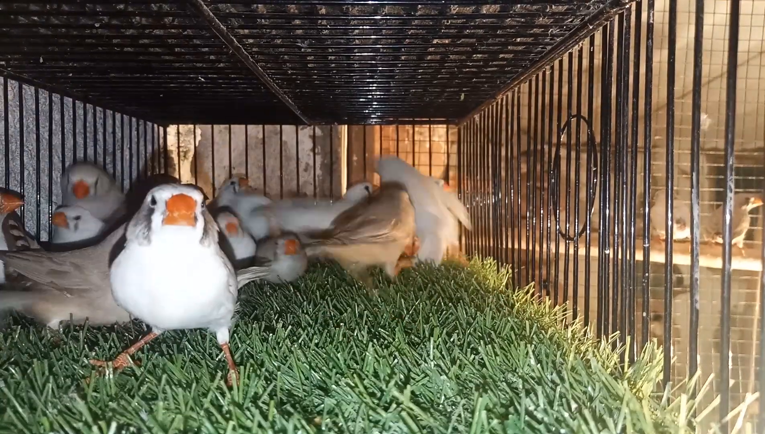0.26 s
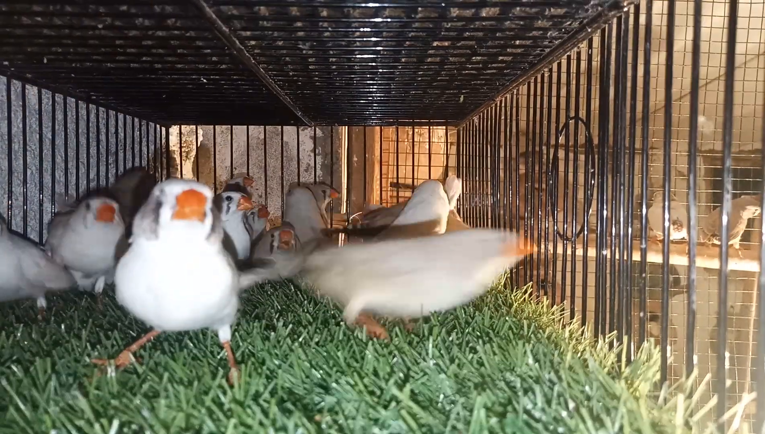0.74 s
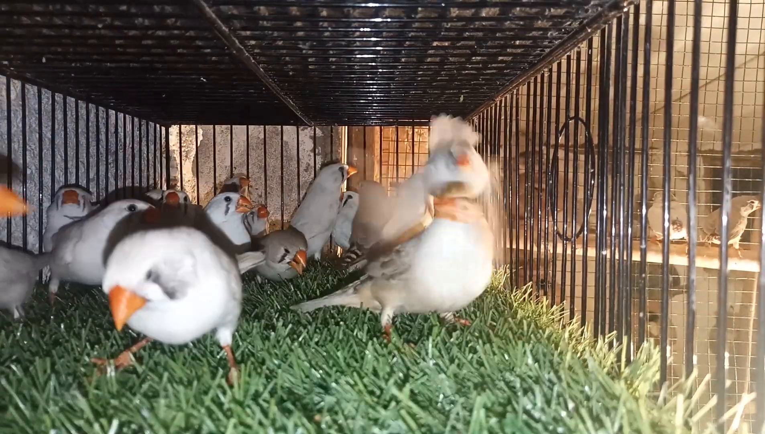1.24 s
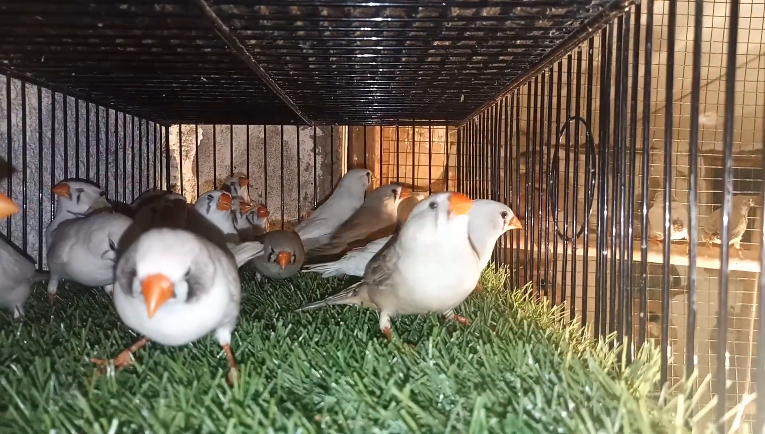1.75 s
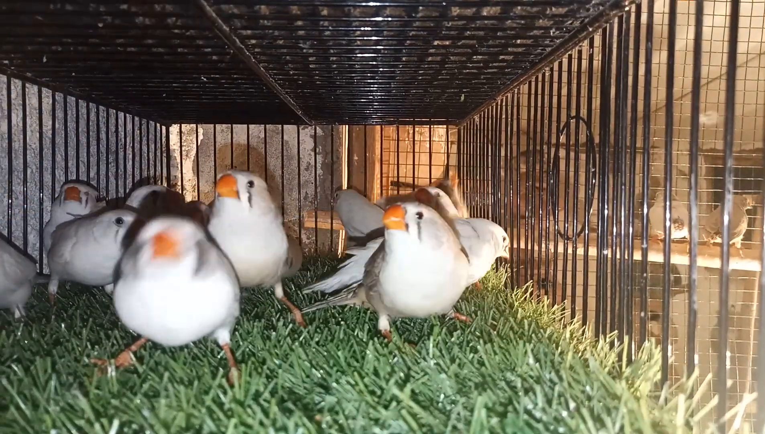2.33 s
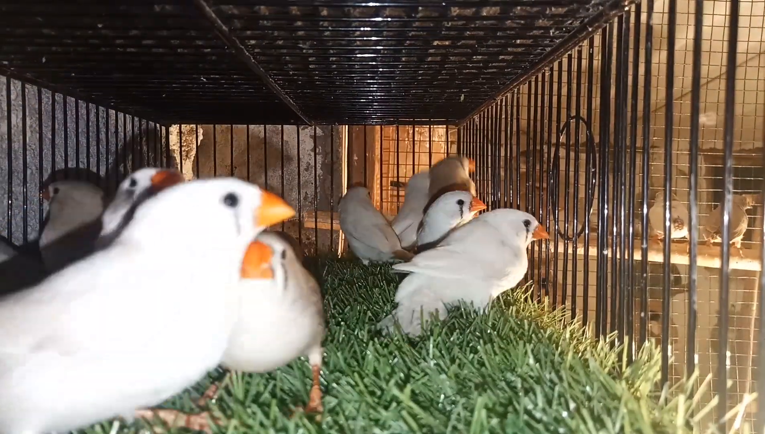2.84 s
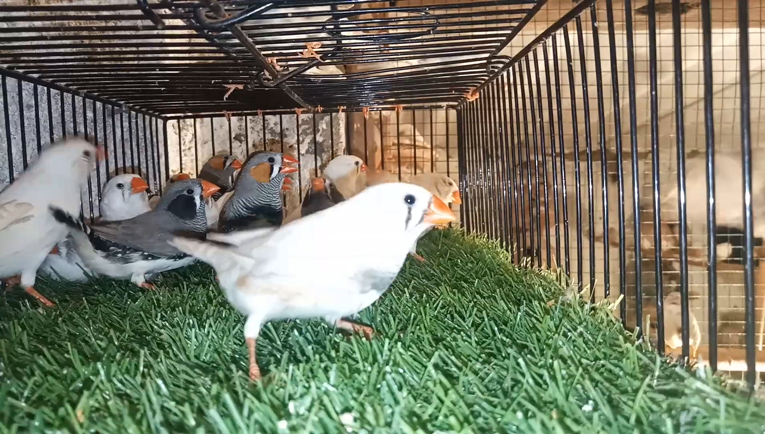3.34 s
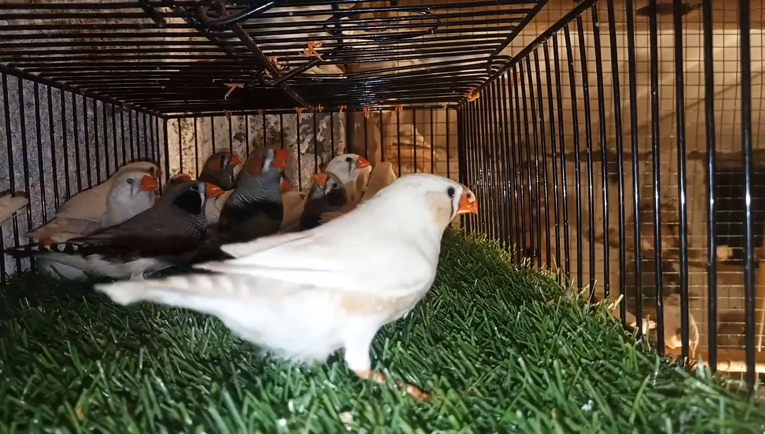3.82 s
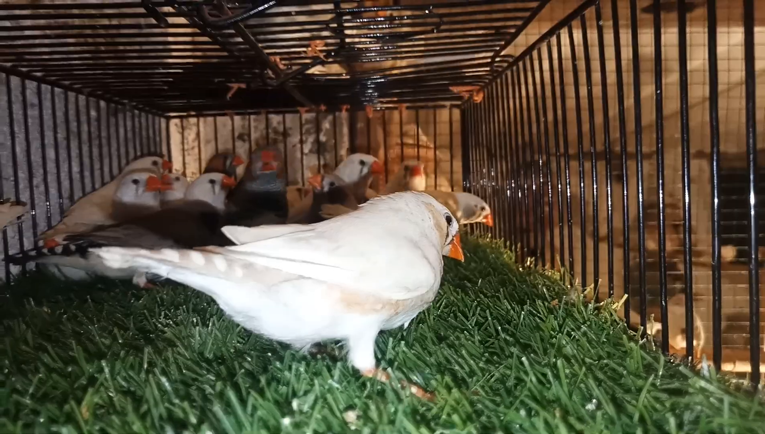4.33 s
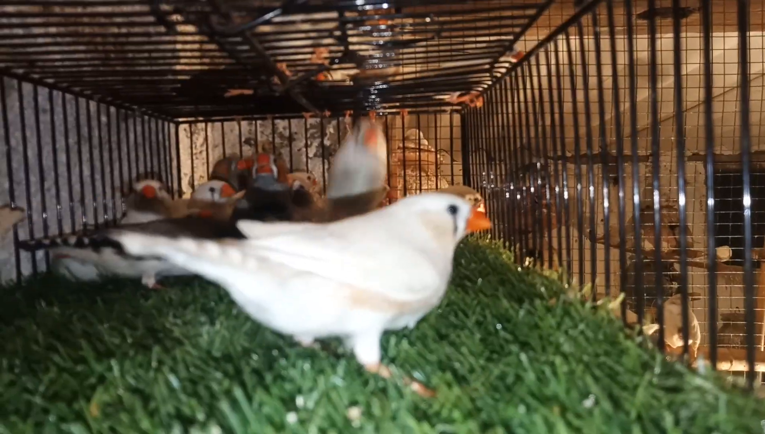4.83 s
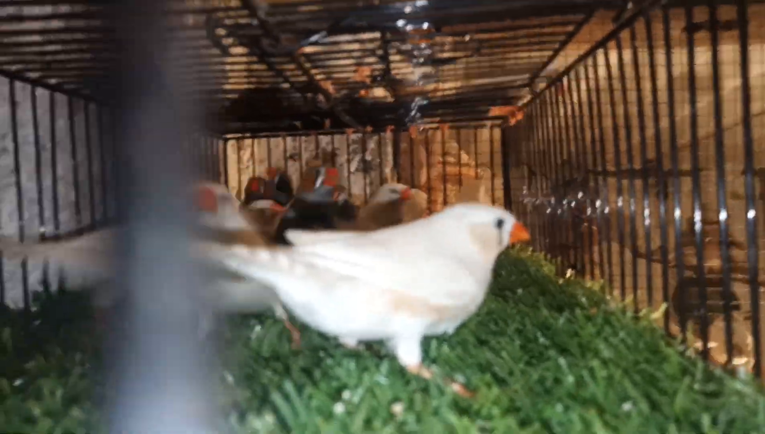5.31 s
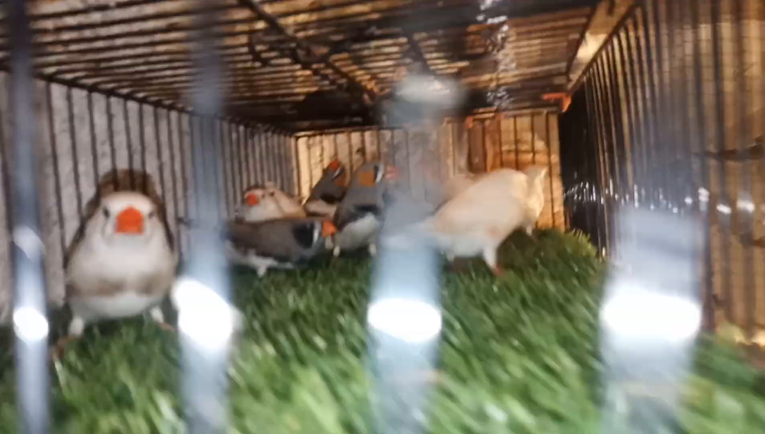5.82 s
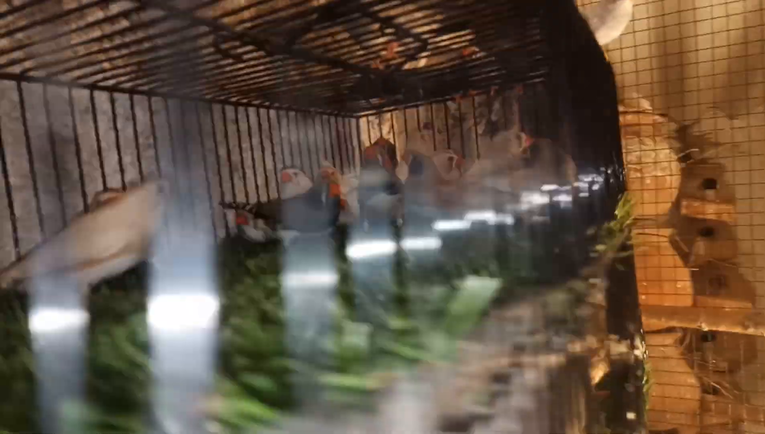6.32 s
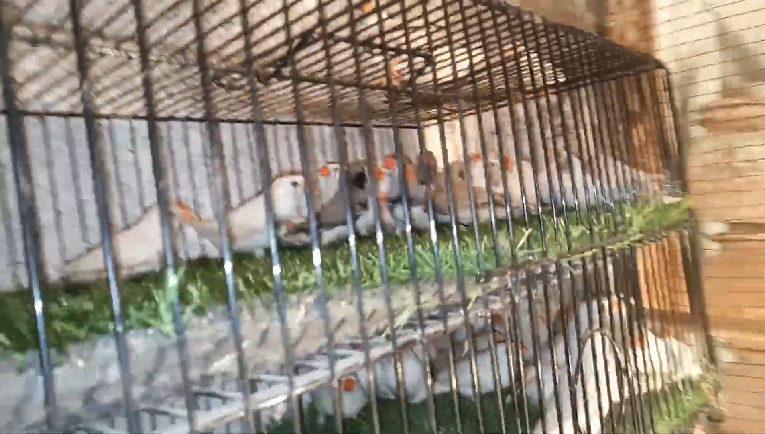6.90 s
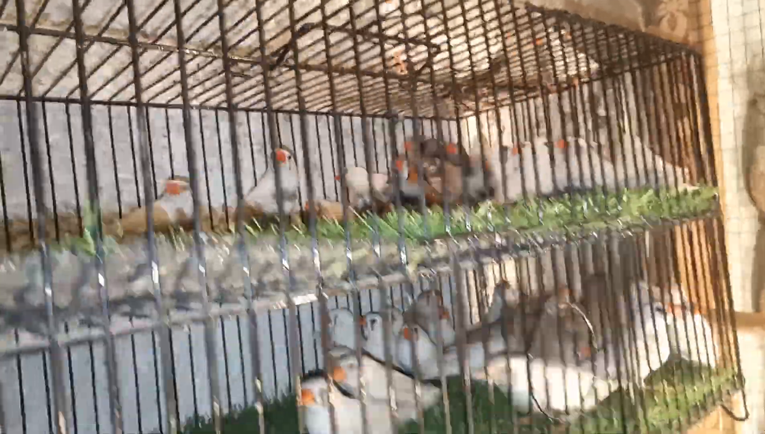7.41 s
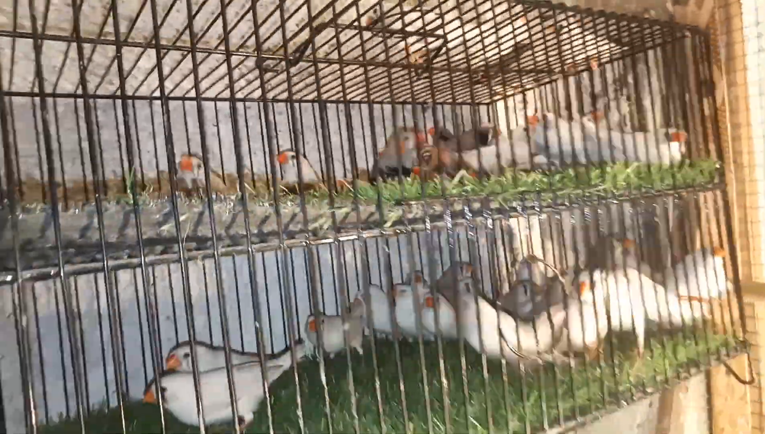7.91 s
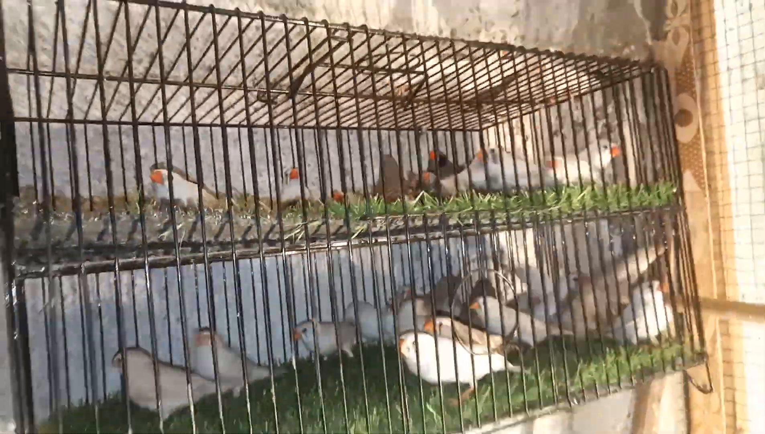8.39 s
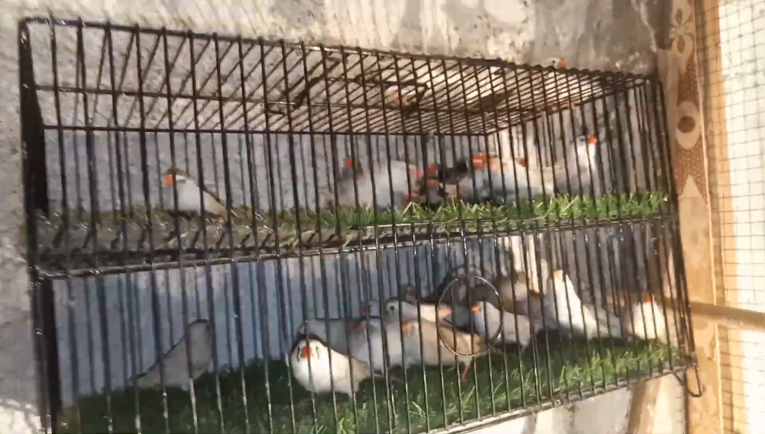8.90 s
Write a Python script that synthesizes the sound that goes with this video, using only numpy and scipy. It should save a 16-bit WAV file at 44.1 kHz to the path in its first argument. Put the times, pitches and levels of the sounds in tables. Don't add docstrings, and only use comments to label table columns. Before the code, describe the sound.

Caged small birds in a reverberant room: nasal, buzzy peeps up close, a murmuring flock behind, soft low rumble and rustling bedding. A short dead gap splits the scene near the start of its second third. Afterwards calls quicken, a hollow wooden nest knocks twice, wings flurry, and bright parakeet screeches and whistles burst out, with a few small claw ticks on wire near the end. The sound is slightly muffled, with little high treble.

```python
import sys
import numpy as np
from scipy import signal
from scipy.fft import rfft, irfft
from scipy.io import wavfile
from scipy.ndimage import uniform_filter1d

SR = 44100
rng = np.random.default_rng(int(sys.argv[2]) if len(sys.argv) > 2 else 0)


def log_audio(samples):
    frames = np.atleast_2d(samples).T
    limited = np.clip(frames, -1, 1)
    pcm = np.round(limited * 32767).astype(np.int16)
    wavfile.write(sys.argv[1], SR, pcm)


def voltage_ratio(decibels):
    exponent = np.asarray(decibels, float) / 20
    return 10 ** exponent


N = 403515

# (time [s], length [s], top pitch [Hz], level [dB], nasal partial [dB])
ARCHED_CALLS = [(1.502, 0.076, 574, -38, -4.5), (7.317, .09, 610, -35, -14), (7.02, .09, 606, -41, -14),
                (7.068, .085, 513, -34, -24), (5.64, .065, 574, -38, -16), (5.33, .05, 525, -39, -20),
                (7.15, .08, 540, -40, -10)]
SCOOPED_CALLS = [(3.66, .068, 576, -43, -16), (4.217, .09, 589, -29, -10), (6.012, .14, 552, -36, -12),
                 (8.042, .089, 529, -39.5, -4), (5.745, .08, 655, -36, -24)]
FALLING_CALLS = [(0.892, 0.091, 526, -29.5, -8), (1.191, 0.086, 680, -30, -13.5),
                 (2.197, 0.075, 645, -30.5, -7), (2.775, .065, 595, -38, -20), (7.225, .07, 665, -36, -18),
                 (2.99, 0.09, 550, -45, -13), (4.029, 0.15, 668, -31.5, -23), (4.318, .098, 532, -31, -6.5),
                 (6.134, 0.11, 567, -37, -6), (8.898, 0.089, 510, -39, -18), (9.018, .21, 517, -35, -18.5)]
LEVEL_CALLS = [(-.04, 0.118, 598, -28.5, -11.5), (.12, 0.095, 642, -35, -27), (0.854, .12, 485, -39.5, 1.5),
               (2.832, .058, 550, -38, -17), (2.885, .07, 496, -41, -17), (3.403, 0.11, 525, -52, -12.5),
               (4.797, .06, 545, -32, -14), (5.39, 0.058, 547, -34, -16), (5.46, 0.115, 492, -38.5, -9.5),
               (5.88, .09, 636, -37, -28), (7.496, .17, 655, -35.5, -22), (8.361, .071, 524, -46, -2),
               (8.702, .13, 525.5, -38.5, -12.5)]
DOUBLED_CALLS = [(.681, 0.084, 629, -36, -7.5), (1.277, 0.1, 613.4, -31, -6.5),
                 (2.465, .133, 606, -28.5, -5), (3.243, 0.12, 622, -25.5, -6)]
HOARSE_CALLS = [(4.716, .09, 575, -30, -12), (2.709, 0.072, 636, -30, -22), (6.84, .14, 590, -33, -20)]
CHESTY_CALLS = [(4.853, .085, 488, -39, -6), (4.945, .08, 502, -39, -6), (5.805, .078, 657, -27.5, -18),
                (7.372, .1, 545, -34, -6), (5.245, .085, 603, -37, -18), (5.021, 0.064, 515, -32, -9.5)]
# (rise [share], fall at 600 Hz [share], chest partials [dB], pulse doubling [dB], rasp [0-1])
CALL_SHAPES = [
    (0.17, 0.13, -10, -26, .2),
    (0.25, .045, -2.5, -24, .18),
    (0.05, 0.1, -9.5, -25.5, .2),
    (.04, 0.04, -8, -24, .22),
    (0.22, 0.08, -10, -14.5, .22),
    (.1, .12, -7, -18, .45),
    (.06, .06, -1.5, -25, .18),
]
FALL_GROWS_WITH_PITCH, CHEST_FOLLOWS_NASAL = 1.8, 0.16
BEAK_HZ, BEAK_FALLS_WITH_PITCH = 3720, 0.24
DULLING = 0.8

# (time [s], length [s], first pitch [Hz], last pitch [Hz], level [dB])
CHIRP_NOTES = [(.02, .05, 3650, 3550, -31), (.226, .06, 2500, 2600, -37), (.31, 0.04, 2600, 2400, -37),
               (.478, .055, 2500, 2800, -18), (1.998, 0.06, 3400, 3400, -37),
               (3.203, 0.0085, 3600, 3420, -31), (3.28, 0.06, 3300, 3400, -25.5),
               (3.966, .06, 2750, 2700, -27.5), (4.281, .04, 3610, 3765, -22.5),
               (4.426, .04, 3300, 3150, -35), (4.285, .04, 2900, 2800, -30),
               (4.499, .03, 3780, 3690, -37.5), (4.544, 0.034, 2546, 2810, -33.5),
               (4.81, .029, 3527, 3350, -31), (5.066, 0.029, 3130, 2940, -31.5),
               (5.889, 0.05, 3880, 3827, -33), (6.826, 0.058, 3980, 3800, -30),
               (7.668, .08, 3382, 2967, -14), (7.791, .091, 5050, 4935, -18.5),
               (7.8, 0.064, 2910, 2875, -13.5), (7.961, 0.052, 3725, 3990, -25),
               (8.067, 0.04, 4170, 3834, -21), (8.146, .07, 2980, 3270, -22.5),
               (8.474, .046, 3860, 3453, -20.5), (8.565, .054, 3500, 3500, -29),
               (8.66, .06, 3500, 3320, -32)]
WHISTLE_NOTES = [(.228, .08, 3050, 3500, -32), (.218, .035, 1800, 2250, -40),
                 (0.275, 0.056, 4500, 4450, -34.5), (8.395, .08, 3950, 3900, -30),
                 (8.565, .08, 3920, 3850, -25), (6.105, .07, 4550, 4500, -33),
                 (5.762, .06, 3950, 3950, -35), (.675, .03, 2100, 2150, -39), (0.491, .1, 2127, 2245, -30),
                 (3.667, .052, 3280, 3470, -31), (1.948, .075, 4300, 4420, -31),
                 (6.468, .04, 2030, 2033, -29), (7.85, .08, 3000, 2980, -23), (3.885, .06, 4050, 3900, -38),
                 (6.553, 0.042, 2960, 3074, -26), (6.653, 0.051, 3125, 2965, -25),
                 (6.545, .26, 6080, 6120, -30.5), (7.655, .06, 2250, 2500, -23),
                 (7.795, 0.1, 2403, 2492, -19.5), (7.907, 0.041, 4430, 4600, -24),
                 (7.94, 0.1, 2208, 2278, -23), (8.028, 0.048, 3600, 4030, -12),
                 (8.03, .054, 2446, 2343, -25.5), (8.216, 0.034, 3837, 3743, -20),
                 (8.386, 0.05, 1992, 1970, -29)]
SCREECH_NOTES = [(.3, 0.038, 3910, 3650, -28.5), (.488, .045, 3204, 3740, -19.5),
                 (1.885, 0.078, 3700, 3600, -36), (2.02, 0.07, 3900, 3500, -36),
                 (3.769, 0.094, 3890, 3730, -44), (3.972, 0.06, 1900, 1800, -33.5),
                 (3.972, .07, 4000, 3850, -29), (4.736, .06, 3910, 3513, -30.5),
                 (5.815, 0.055, 3900, 3800, -35), (6.048, .085, 3825, 4150, -34.5),
                 (6.168, .037, 3955, 3660, -29), (6.331, 0.041, 3350, 3750, -14.5),
                 (6.392, 0.05, 4200, 3700, -19), (6.398, .05, 2700, 2400, -27),
                 (6.43, .04, 3700, 3300, -22), (6.464, .05, 4200, 3950, -19), (6.332, .03, 2800, 2600, -25),
                 (6.538, .009, 3500, 4100, -7), (2.66, .05, 2900, 3000, -40), (2.718, .06, 3700, 3500, -38),
                 (.495, .06, 5900, 6200, -18), (6.546, .034, 4000, 3700, -13),
                 (6.541, 0.034, 5300, 5600, -13), (6.637, 0.045, 4593, 3510, -11.5),
                 (6.642, 0.065, 5460, 5710, -14.5), (6.88, .09, 3600, 3400, -31),
                 (8.055, 0.069, 5000, 4800, -22), (8.147, .07, 4630, 4100, -18),
                 (8.432, 0.035, 3900, 3400, -26), (8.62, 0.07, 3800, 3500, -29),
                 (8.73, .074, 3907, 3534, -26.5), (8.749, 0.05, 1725, 1639, -33.5)]
WHISTLE_OVERTONES = [-4.5, -3, -1, 3, -2]
WHISTLE_WARBLE_HZ_S, CHIRP_WARBLE_HZ, SCREECH_WARBLE_HZ, WARBLE_PER_GLIDE = 2.8, 213, 423, 0.3

# (time [s], length [s], first pitch [Hz], last pitch [Hz], level [dB])
COO_NOTES = [(0.425, 0.24, 554, 783, -41.5), (0.577, 0.27, 787.3, 794, -46.5),
             (0.79, 0.23, 779, 732, -42.5), (3.265, 0.195, 680, 690.5, -37), (3.448, 0.11, 674, 661.6, -39),
             (3.657, 0.07, 648, 643, -44.5), (5.251, 0.13, 594, 645, -41.5), (5.42, 0.2, 657, 665, -42),
             (6.506, 0.08, 603, 664, -38.5), (6.584, 0.082, 667, 675, -35), (1.848, 0.06, 1327, 1303, -44),
             (2.005, 0.1, 1360, 1360, -35.5), (7.224, 0.041, 1754, 1250, -34.5),
             (1.48, 0.34, 2870, 2810, -45), (1.7, .7, 84, 80, -37), (2.2, .5, 80, 78, -38),
             (3.0, .45, 76, 78, -39), (3.35, .6, 78, 80, -38), (.46, .09, 1030, 990, -41),
             (3.7, .2, 650, 660, -44), (6.3, .22, 590, 610, -43), (1.6, .24, 2840, 2820, -44)]

# (time [s], hold [s], level [dB], share of low voices [dB])
FLOCK_OUTBURSTS = [(.19, 0.16, -45.5, -5.5), (0.529, 0.067, -42.5, 2), (1.64, 0.05, -50, -4),
                   (1.952, 0.16, -50, -9), (2.68, .24, -47, -10), (3.293, 0.012, -36, 1),
                   (3.584, 0.13, -50.5, -9), (3.94, 0.57, -43.5, -6), (4.76, 0.1, -38, -8),
                   (5.56, .06, -45, -3), (5.225, 0.21, -43, -2), (5.776, .12, -39, -3.5),
                   (6.175, 0.06, -33, -10), (6.38, 0.1, -32, -10), (6.502, 0.31, -36.5, -17.5),
                   (6.886, 0.11, -36, -6), (7.03, .08, -40, -5), (7.16, 0.29, -42, -1.5),
                   (7.852, .24, -32.5, -36), (8.205, .28, -36, -9.5), (8.584, 0.035, -33, -7),
                   (8.706, 0.081, -33.5, -11), (9.11, .1, -49, -2)]
OUTBURST_RISE_DB_PER_S, OUTBURST_FADE_DB_PER_S = 160.5, 148.5
MURMUR_DB, MURMUR_LOW_DB = -63, -56.5

# (time [s], level [dB])
MACHINE_LEVEL = [(0.0, -36), (.43, -47), (.74, -37.5), (1.17, -45.5), (1.4, -39.5), (1.63, -51.5),
                 (2.34, -43), (2.75, -54), (3.18, -41), (3.4, -42.5), (3.8, -44.5), (4.4, -50.5),
                 (5.4, -47), (5.8, -50.5), (6.3, -42), (7.5, -44), (8.0, -41.5), (9.15, -50)]
# (frequency [Hz], density [dB per Hz])
RUMBLE_SPECTRUM = [(15, -55), (25, -45), (32, -34), (48, -26), (70, -3.5), (91, 4.5), (149, 1), (179, -4),
                   (210, -31.5), (260, -25.5), (340, -50.5), (570, -120)]
# (frequency [Hz], density [dB per Hz])
RUSTLE_SPECTRUM = [(180, -4), (300, -3), (600, -2.5), (1000, -8.5), (2000, -8), (3500, -9.5), (4800, -26.5)]
BEDDING_DB, BEDDING_FOLLOWS = -49.5, 0.35
# (time [s], hold [s], rustle [dB], push of air [dB])
WING_FLURRIES = [(.48, .03, -52.5, -43.5), (1.71, 0.063, -92, -38), (2.9, 0.01, -63.5, -48),
                 (3.18, 0.0091, -43, -36), (4.52, .03, -50.5, -41.5), (5.2, 0.067, -54, -60.5),
                 (5.89, 0.022, -48.5, -41), (6.5, 0.23, -43, -56), (6.65, 0.01, -51, -41),
                 (6.88, 0.069, -41.5, -48), (7.26, 0.047, -49.5, -43.5), (7.6, 0.26, -44, -42.5),
                 (7.9, 0.23, -42, -48.5), (8.2, 0.52, -43.5, -57)]
FLURRY_RISE_DB_PER_S, FLURRY_FADE_DB_PER_S = 90, 57

# (time [s], peak level [dB])
NEST_HITS = [
    (4.468, -28.5),
    (4.484, -19),
]
# (frequency [Hz], level [dB], decay by 60 dB [s])
NEST_MODES = [
    (334, -21, .15),
    (408, -3, 0.47),
    (475, 1, 0.39),
    (1030, -8, 0.064),
]
# (time [s], peak level [dB])
CLAW_TICKS = [
    (8, -28),
    (8.421, -46),
    (8.52, -25.5),
]

# (frequency [Hz], gain [dB])
MICROPHONE_RESPONSE = [(40, -8), (70, -3), (4300, 0.5), (4900, -10.5), (5500, -22), (6200, -23),
                       (6900, -36.5), (9500, -45.5), (12000, -42), (14000, -45.5)]
ROOM_T60_S = 0.25
HISS_DB = -76
GAP_START_S, GAP_END_S, FULL_LEVEL_S = 3.0515, 3.1675, 3.1945


def at_hz(points, hz):
    table_hz, table_db = np.transpose(points)
    return np.interp(np.log(np.maximum(hz, 1)), np.log(table_hz), table_db)


def in_time(rows):
    s, *columns = np.transpose(rows)
    return [np.interp(np.arange(N) / SR, s, column) for column in columns]


def rms_one(x):
    return x / np.sqrt(np.mean(x ** 2) + 1e-20)


def wander(rate_hz, size):
    sos = signal.butter(2, rate_hz, fs=SR, output="sos")
    return rms_one(signal.sosfilt(sos, rng.standard_normal(size + 3000))[3000:])


def chance():
    size = N + SR + SR // 2
    return np.array([wander(hz, size) for hz in (81, 900, 48, 170, 130)])


def coloured(points):
    gain = voltage_ratio(at_hz(points, np.fft.rfftfreq(N, 1 / SR)))
    return rms_one(irfft(rfft(rng.standard_normal(N)) * gain, N))


def add(out, s, sound):
    i = int(s * SR)
    part = sound[max(-i, 0):N - i]
    out[max(i, 0):max(i, 0) + len(part)] += part


def swell(length, rise, fall):
    u = np.linspace(0, 1, int(length * SR))
    ramp = np.clip(np.minimum(u / rise, (1 - u) / fall), 0, 1)
    return u, np.sin(np.pi / 2 * ramp) ** 2


def bursts(rows, rise_db_per_s, fade_db_per_s):
    s, hold, *levels = np.transpose(rows)[:, :, None]
    t = np.arange(0, N + 64, 64) / SR
    rise_loss = rise_db_per_s * np.maximum(s - t, 0)
    fade_loss = fade_db_per_s * np.maximum(t - s - hold, 0)
    gains = []
    for db in levels:
        power = np.sum(voltage_ratio(2 * (db - rise_loss - fade_loss)), axis=0)
        gains.append(np.interp(np.arange(N) / SR, t, np.sqrt(power)))
    return gains


def room(x):
    t = np.arange(int(0.6 * SR)) / SR
    tail = rng.standard_normal(len(t)) * voltage_ratio(-60 * t / ROOM_T60_S) * (t > 0.004)
    return signal.fftconvolve(x, tail / np.sqrt(np.sum(tail ** 2)))[:N]


def finch_call(luck, length, top_hz, rise, fall, nasal_db, chest_db, double_db, rasp=0.25,
               beak_hz=3650, far_db=-8):
    u, shape = swell(length, 0.24, 0.18)
    jitter, breath, sway = luck[:3, :len(u)]
    arch = 1 - rise * (1 - u) ** 4.5 - fall * u ** 4.5
    hz = top_hz * arch * (1 + 0.025 * rasp * jitter)
    phase = 2 * np.pi * np.cumsum(hz) / SR
    beak = [(500, nasal_db - 16.5), (1150, nasal_db), (1800, chest_db - 3), (2500, chest_db - 2),
            (beak_hz - 650, -9), (beak_hz, 1.5), (beak_hz + 750, -9), (6300, far_db - 26), (9000, far_db - 37)]
    k = np.arange(1, 13)[:, None]
    gain = voltage_ratio(at_hz(beak, k * hz) + 1.5 * rng.standard_normal(k.shape))
    turns = rng.random(k.shape) + u * rng.normal(0, 1.02, k.shape)
    gain = gain * voltage_ratio(1.5 * np.sin(2 * np.pi * turns))
    stack = np.sum(gain * np.sin(k * phase + 0.94 * rng.standard_normal(k.shape)), axis=0)
    uneven = 1 + 2 * voltage_ratio(np.minimum(double_db, -3)) * np.cos(phase / 2) + rasp * breath
    return shape * rms_one(stack * uneven) * voltage_ratio(3.0 * u + 0.5 * sway)


def finches(luck):
    out = np.zeros(N)
    tables = (ARCHED_CALLS, SCOOPED_CALLS, FALLING_CALLS, LEVEL_CALLS, DOUBLED_CALLS, HOARSE_CALLS,
              CHESTY_CALLS)
    for table, (rise, fall, chest_db, double_db, rasp) in zip(tables, CALL_SHAPES):
        for s, length, hz, level_db, nasal_db in table:
            own = luck[:, int((s + 1) * SR):]
            beak_hz = BEAK_HZ * (580 / hz) ** BEAK_FALLS_WITH_PITCH
            drop = fall * (hz / 600) ** FALL_GROWS_WITH_PITCH
            low_db = chest_db + CHEST_FOLLOWS_NASAL * (nasal_db + 12)
            far_db = DULLING * (level_db + 27)
            call = finch_call(own, length, hz, rise, drop, nasal_db, low_db, double_db, rasp, beak_hz, far_db)
            add(out, s, voltage_ratio(level_db) * call)
    return out


def rumble_and_rustle():
    machine_db, = in_time(MACHINE_LEVEL)
    wings, push = bursts(WING_FLURRIES, FLURRY_RISE_DB_PER_S, FLURRY_FADE_DB_PER_S)
    rumble = np.hypot(voltage_ratio(machine_db), push) * coloured(RUMBLE_SPECTRUM)
    bedding = voltage_ratio(BEDDING_DB + BEDDING_FOLLOWS * (machine_db - machine_db.mean()))
    stirring = voltage_ratio(1.0 + 2.56 * wander(4.9, N))
    return rumble + np.hypot(bedding, wings) * stirring * coloured(RUSTLE_SPECTRUM)


def chirp(luck, length, first_hz, last_hz, warble_hz, effort_db=-20):
    u, shape = swell(length, 0.06, 0.4)
    warble = 1.1 * warble_hz * (1 - 0.5 * u) * np.sin(1.5 * luck[3, :len(u)])
    hz = last_hz + (first_hz - last_hz) * (1 - u) ** 2.5 + warble
    phase = 2 * np.pi * np.cumsum(hz) / SR
    throb = voltage_ratio(3.75 * luck[4, :len(u)])
    tones = np.sin(phase)
    for k, db in enumerate(WHISTLE_OVERTONES, start=2):
        shrill_db = 0.5 * effort_db * (k * hz > 4700)
        tones = tones + voltage_ratio(db + shrill_db) * np.sin(k * phase) * (k * hz < 0.45 * SR)
    return shape * rms_one(throb) * tones * np.sqrt(2)


def parakeets(luck):
    out = np.zeros(N)
    notes = [tuple(note) + (WHISTLE_WARBLE_HZ_S / note[1],) for note in WHISTLE_NOTES]
    for table, warble_hz in ((CHIRP_NOTES, CHIRP_WARBLE_HZ), (SCREECH_NOTES, SCREECH_WARBLE_HZ)):
        for note in table:
            glide_hz = abs(note[3] - note[2])
            notes.append(tuple(note) + (warble_hz + WARBLE_PER_GLIDE * glide_hz,))
    for k, (s, length, first_hz, last_hz, level_db, warble_hz) in enumerate(notes):
        own = luck[:, k * N // len(notes):]
        sound = chirp(own, length, first_hz, last_hz, warble_hz, level_db + 9.5)
        add(out, s, voltage_ratio(level_db) * sound)
    return out


def flock(luck, count):
    out = np.zeros(N)
    for s, size, pitch, arch, kind, at in rng.random((count, 6)):
        own = luck[:, int(at * N):]
        if kind < 0.7:
            rise, fall = 0.0623 + 0.207 * arch, 0.055 + 0.12 * arch
            call = finch_call(own, 0.0497 + 0.0461 * size, 490 + 190 * pitch, rise, fall,
                              nasal_db=-13.5, chest_db=-4.5, double_db=-19.5, rasp=0.4)
        else:
            call = chirp(own, 0.017 + 0.04 * size, 3000 + 1300 * pitch, 3000 + 1200 * arch, warble_hz=400)
        add(out, s * N / SR, call)
    out = room(out) + voltage_ratio(-4.5) * out
    out = out / np.sqrt(uniform_filter1d(out ** 2, size=3500) + 1e-4)
    rows = [(s, hold, db, db + share_db) for s, hold, db, share_db in FLOCK_OUTBURSTS]
    high_gain, low_gain = bursts(rows, OUTBURST_RISE_DB_PER_S, OUTBURST_FADE_DB_PER_S)
    low = signal.sosfiltfilt(signal.butter(3, 2400, fs=SR, output="sos"), out)
    high_voices = (high_gain + voltage_ratio(MURMUR_DB)) * rms_one(out - low)
    low_voices = (low_gain + voltage_ratio(MURMUR_LOW_DB)) * rms_one(low)
    return high_voices + low_voices


def doves(luck):
    out = np.zeros(N)
    for s, length, first_hz, last_hz, level_db in COO_NOTES:
        u, shape = swell(length, 0.62, 0.25)
        pitch_sway = luck[2, int(s * SR):][:len(u)]
        throat = luck[2, int((s + 1) * SR):][:len(u)]
        hz = first_hz + (last_hz - first_hz) * u + 0.01 * min(first_hz, 900) * pitch_sway
        flutter_db = min(first_hz / 250, 3) * throat - 1
        coo = shape * np.sin(2 * np.pi * np.cumsum(hz) / SR)
        add(out, s, voltage_ratio(level_db + flutter_db) * coo)
    return out


def nest_knocks():
    out, t = np.zeros(N), np.arange(SR // 2) / SR
    nest = sum(voltage_ratio(db - 60 * t / t60) * np.sin(2 * np.pi * hz * t) for hz, db, t60 in NEST_MODES)
    for s, level_db in NEST_HITS:
        add(out, s, voltage_ratio(level_db - 9.5) * nest)
    return out


def claw_ticks():
    out, t = np.zeros(N), np.arange(SR // 2) / SR
    band = signal.butter(2, [350, 2500], "band", fs=SR, output="sos")
    for s, level_db in CLAW_TICKS:
        burst = rng.standard_normal(len(t)) * voltage_ratio(-60 * t / 0.031)
        add(out, s, voltage_ratio(level_db + 11.0) * signal.sosfilt(band, burst))
    return out


def scene():
    luck = chance()
    crowd = flock(luck, count=280)
    near = finches(luck)
    far = parakeets(luck) + doves(luck)
    wet = room(voltage_ratio(-9.5) * near + voltage_ratio(-2) * far)
    birds = near + voltage_ratio(-2.5) * far + wet + crowd
    return (birds + nest_knocks() + claw_ticks() + rumble_and_rustle())[None]


def roll_off(x):
    return signal.sosfilt(signal.butter(12, 15550, fs=SR, output="sos"), x)


def record(dry):
    response = voltage_ratio(at_hz(MICROPHONE_RESPONSE, np.fft.rfftfreq(N, 1 / SR)))
    x = irfft(rfft(dry) * response, N)
    x = 1.65 * np.tanh(x / 1.712) + voltage_ratio(HISS_DB) * rng.standard_normal(x.shape)
    t = np.arange(N) / SR
    silent = (t > GAP_START_S) & (t < GAP_END_S)
    sliver = (t >= GAP_END_S) & (t < FULL_LEVEL_S)
    mix = x * np.where(silent, 0, np.where(sliver, 0.4, 1))
    return roll_off(mix)


dry = scene()
out = record(dry)
log_audio(out)
```